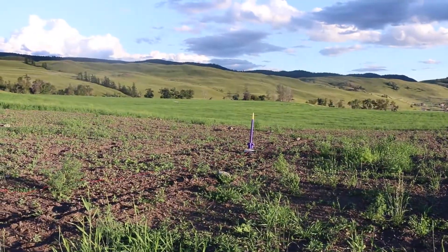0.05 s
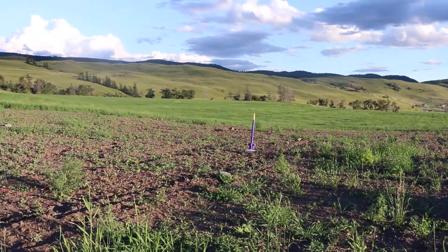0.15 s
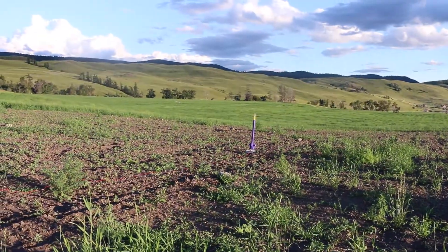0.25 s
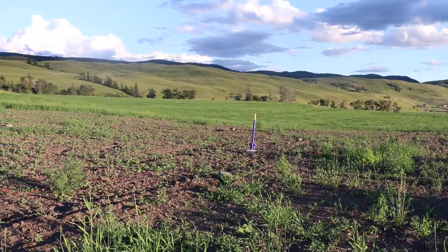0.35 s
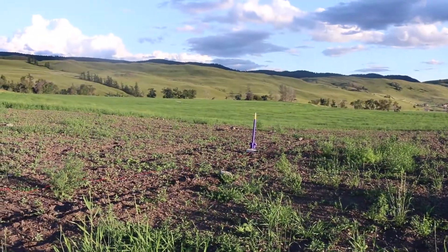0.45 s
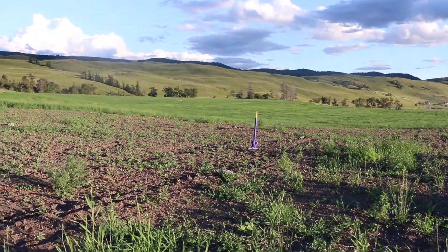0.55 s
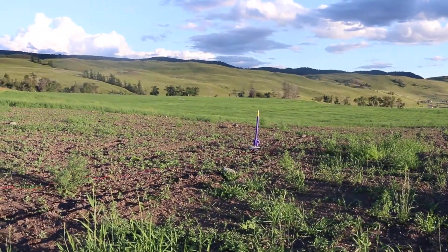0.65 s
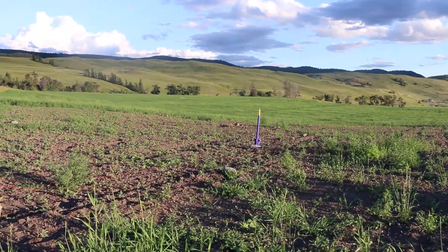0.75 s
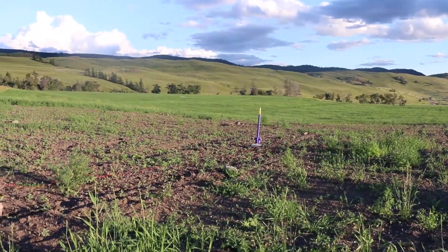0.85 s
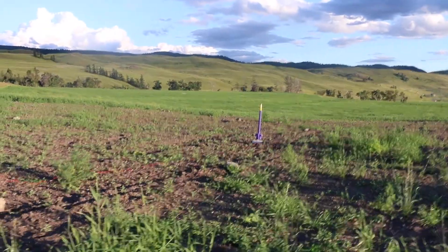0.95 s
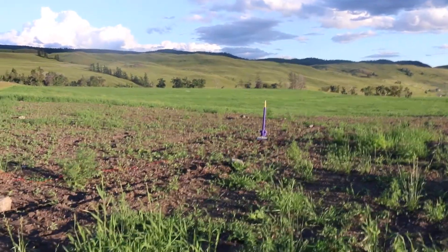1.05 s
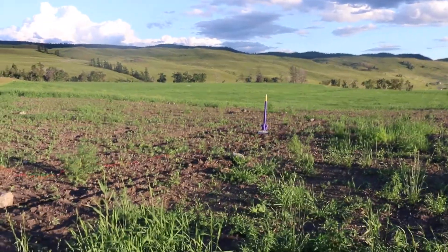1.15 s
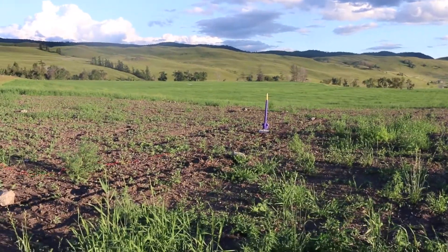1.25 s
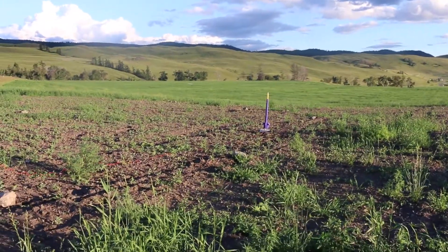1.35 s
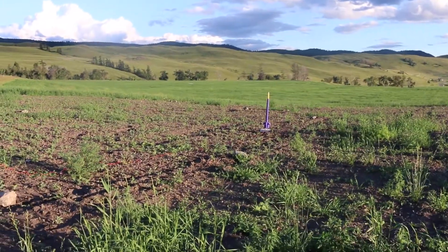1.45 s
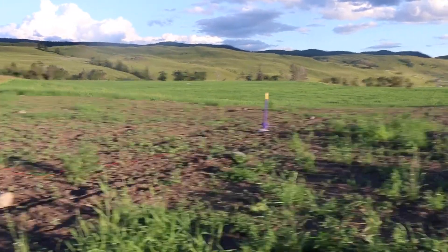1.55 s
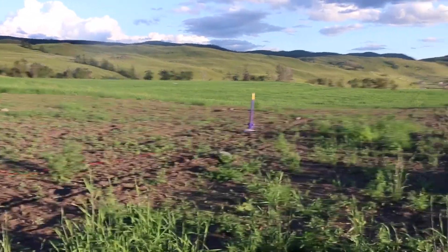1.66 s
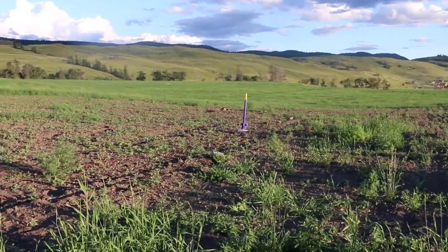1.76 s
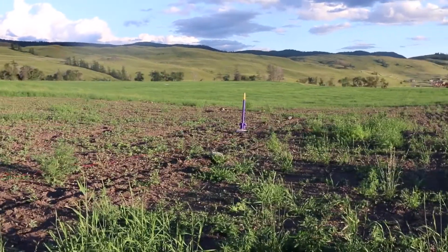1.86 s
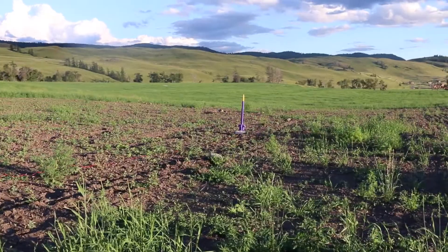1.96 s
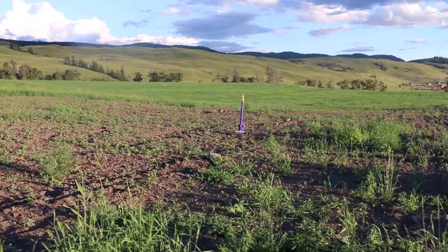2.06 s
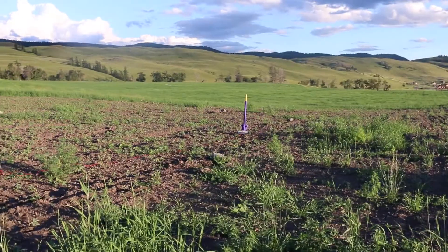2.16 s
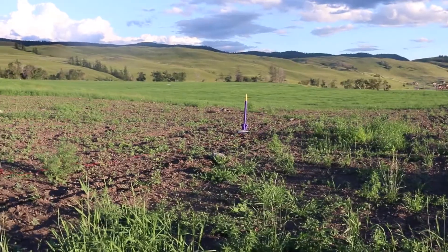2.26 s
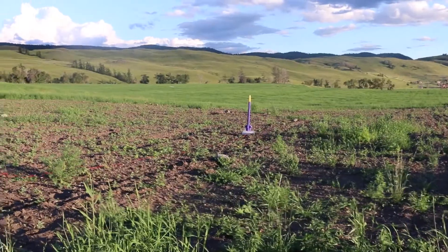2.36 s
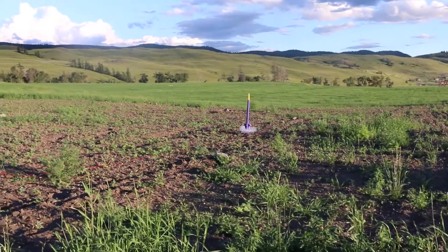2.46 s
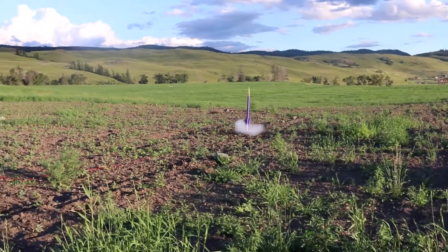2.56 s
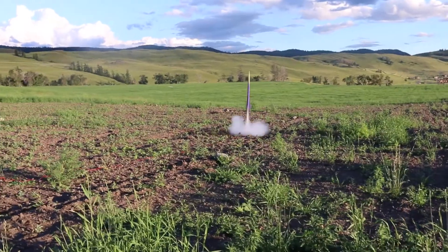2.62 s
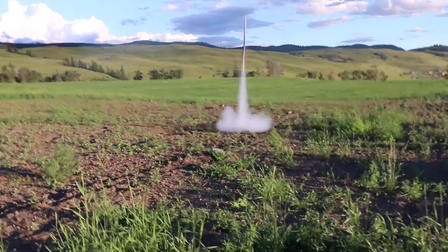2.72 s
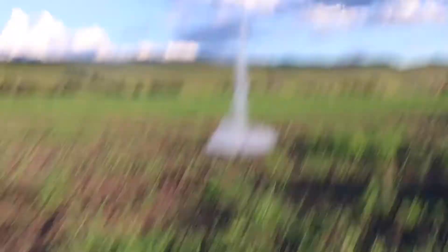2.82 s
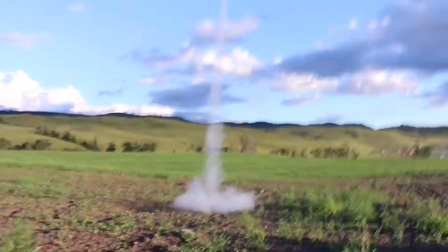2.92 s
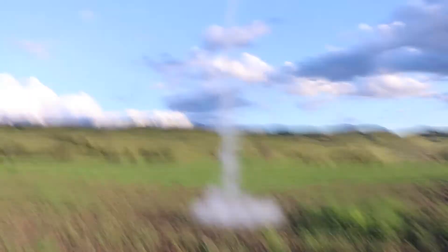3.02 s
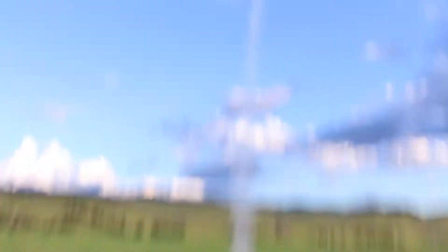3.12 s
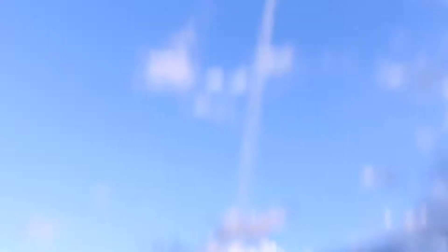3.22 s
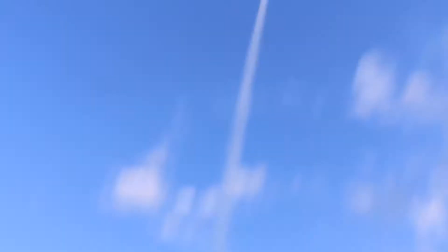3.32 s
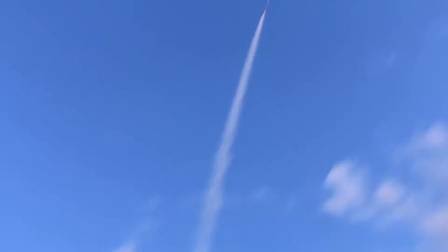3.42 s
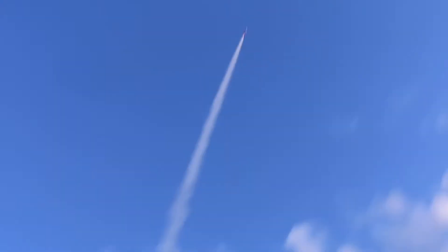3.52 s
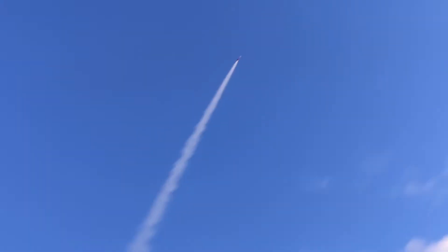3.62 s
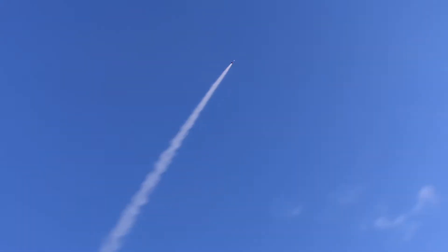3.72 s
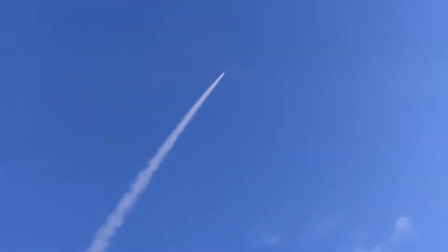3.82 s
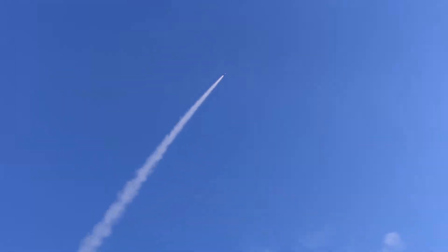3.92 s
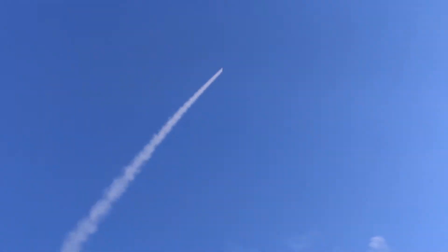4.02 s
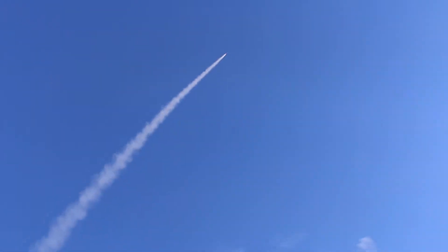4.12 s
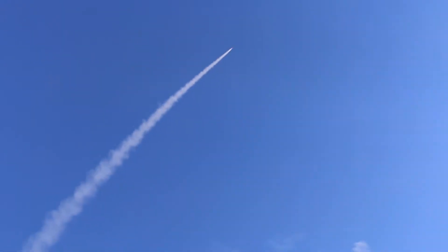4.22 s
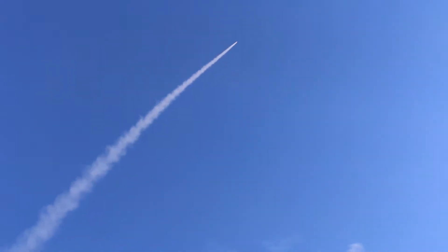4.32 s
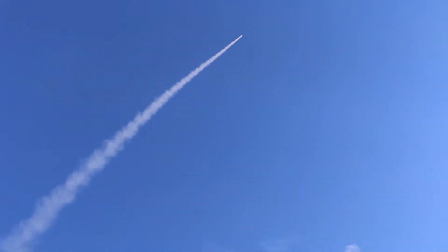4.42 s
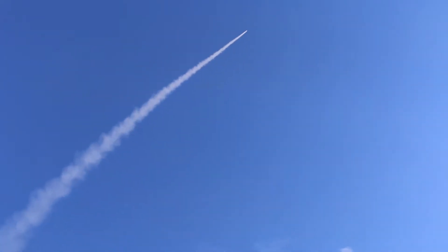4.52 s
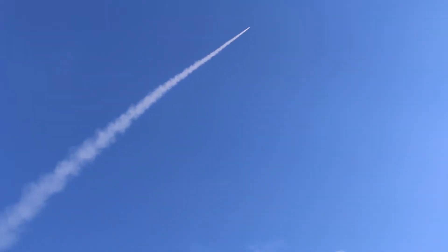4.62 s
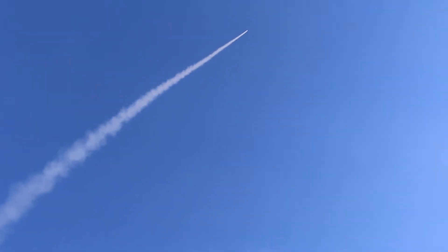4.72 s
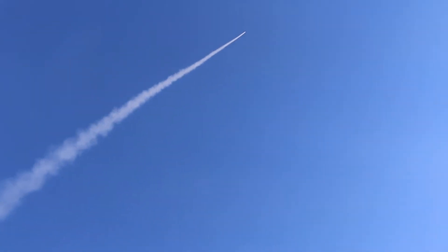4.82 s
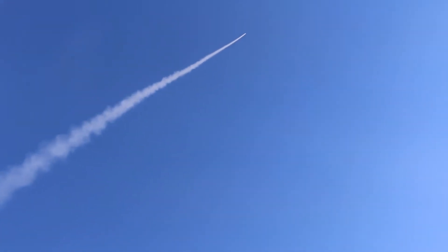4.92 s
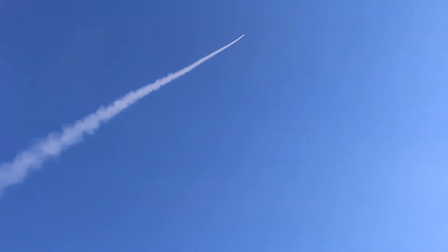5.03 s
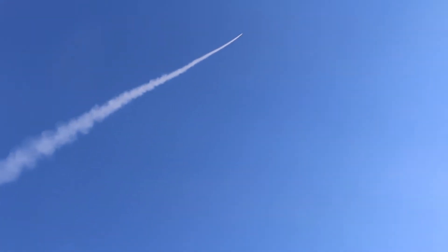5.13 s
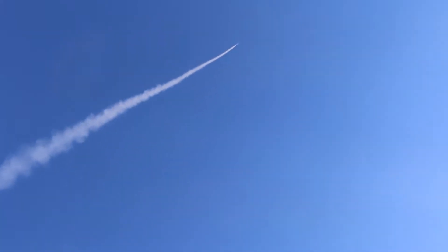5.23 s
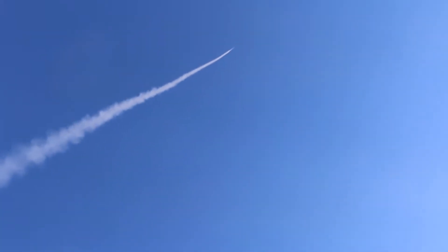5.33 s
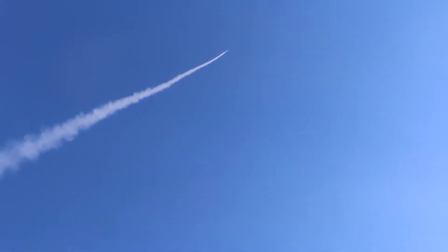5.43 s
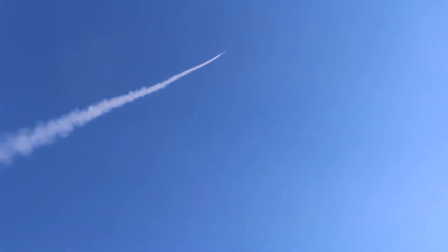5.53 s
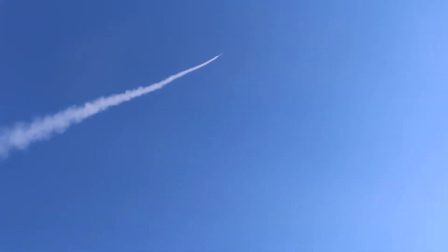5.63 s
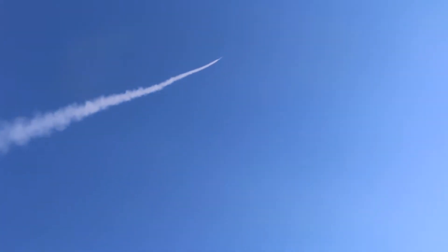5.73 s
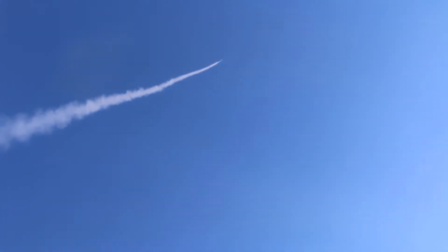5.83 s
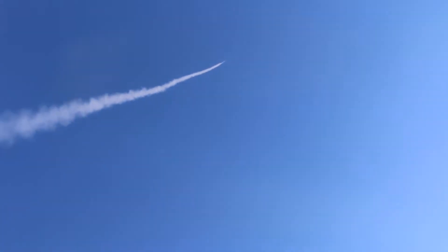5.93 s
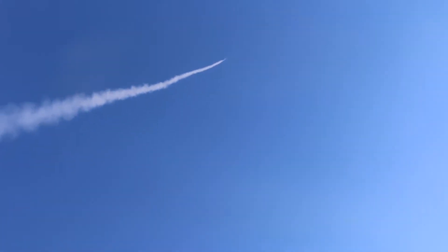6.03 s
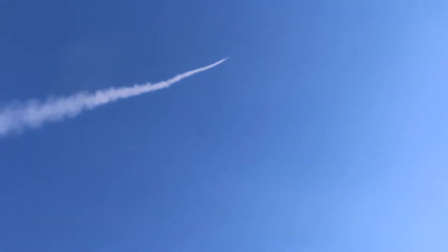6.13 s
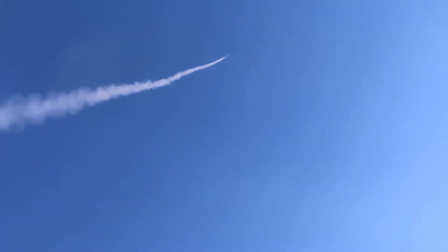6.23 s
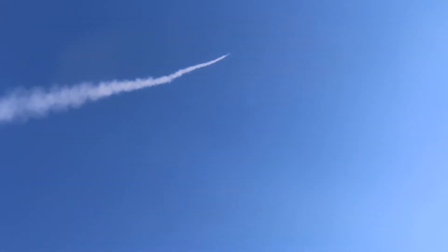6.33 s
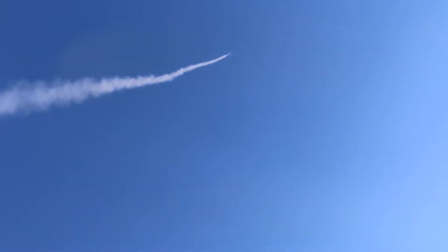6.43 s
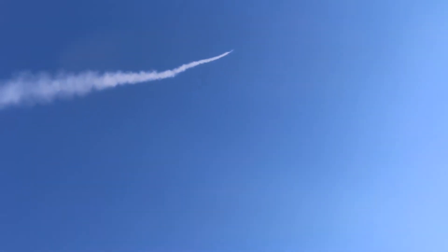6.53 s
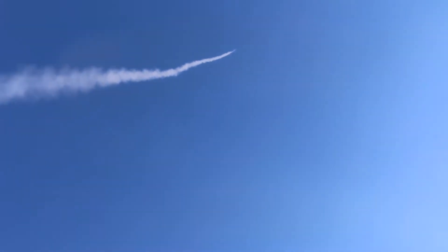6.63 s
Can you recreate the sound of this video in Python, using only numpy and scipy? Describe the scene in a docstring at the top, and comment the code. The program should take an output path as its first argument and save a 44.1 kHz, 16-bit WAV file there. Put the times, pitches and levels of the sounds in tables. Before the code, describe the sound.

Outdoors, heard from a hand-held camera: soft country hush, a raspy bird chip, thin whistles, then plastic clicking nearby. A loud snap and a thin hiss burst into a rocket's full jet roar, almost central at first, then widening as it rises, with irregular pops. The burn flares and quickly dies; its hissy echo fades over the hills while wind bumps the microphone.

```python
"""A model rocket lifts off from a ploughed field, some metres from a hand-held camera.
Filtered noise makes the jet: it hisses on the pad, climbs and burns out, with short spikes for its cracks.
A delayed copy off the soil sweeps a comb through the roar; long noise tails and delays make the echoes.
Before it come a few plastic clicks, built from ringing tones, and faint birds, built from gliding tones.
Light wind and the hush of the field are coloured noise."""
import sys
import numpy as np
from scipy import signal
from scipy.fft import rfft, irfft, next_fast_len
from scipy.io import wavfile
from scipy.ndimage import uniform_filter1d, map_coordinates

SR = 44100
rng = np.random.default_rng(int(sys.argv[2]) if len(sys.argv) > 2 else 0)


def master(y):
    """Save y as 16-bit WAV."""
    cut = np.clip(np.atleast_2d(y).T, -1, 1)
    pcm = np.round(cut * 32767)  # scale
    wavfile.write(sys.argv[1], SR, pcm.astype(np.int16))


N = 294279
T = np.arange(N) / SR  # time of every sample [s]
LEFT_RIGHT = np.array([[1], [-1]])  # opposite signs for the left and right port


def undb(db):
    """Turn decibels into gain."""
    return 10 ** (np.asarray(db) / 20)


def level(x, db=0):
    """Set the average (rms) level."""
    return x * undb(db) / np.sqrt(np.mean(x ** 2))


def curve(rows, t, axis=1):
    """Read one column of a table, joined by straight lines in time."""
    rows = np.array(rows)
    return np.interp(t, rows[:, 0], rows[:, axis])


def spectrum(rows, hz, axis=1):
    """Read one column of a table, joined on a log-frequency axis."""
    rows = np.array(rows)
    return np.interp(np.log(hz + 1), np.log(rows[:, 0]), rows[:, axis])


def colour(x, rows, axis=1):
    """Shape the tone with a fixed filter drawn from table points."""
    size = next_fast_len(N, real=True)
    gain = undb(spectrum(rows, np.fft.rfftfreq(size, 1 / SR), axis=axis))
    return irfft(rfft(x, size) * gain, size)[:N]


def butter(x, hz, kind="low", order=1):
    """Keep what lies below ("low") or above ("high") a frequency."""
    sos = signal.butter(order, min(hz, SR / 2 - 1), kind, fs=SR, output="sos")
    return signal.sosfilt(sos, x)


def moving_noise(db_at, size=512):
    """White noise under a gain db_at(Hz, s) that moves in time."""
    hz, t, z = signal.stft(rng.standard_normal(N), SR, nperseg=size)
    return signal.istft(z * undb(db_at(hz[:, None], t)), SR, nperseg=size)[1][:N]


def walk(rate):
    """Wander smoothly between random values, 'rate' of them a second; spread 1."""
    k = int(SR / rate)
    steps = np.repeat(rng.standard_normal(N // k + 1), k)
    return level(uniform_filter1d(steps, k)[:N])


def add(track, s, sound):
    """Mix a sound in at a time."""
    i = int(s * SR)
    track[i:i + len(sound)] += sound[:N - i]


# colour of the still air: (frequency [Hz], level per Hz [dB])
FIELD_COLOUR = [(15, -29), (25, -17), (64, -8), (87, -11), (120, -2.5), (195, -13.5), (263, -12.5),
                (439, -13), (476, -11), (607, -15.5), (988, -14.5), (1190, -17.5), (4140, -22.5),
                (16000, -31)]
# width of the hush: (frequency [Hz], side relative to middle [dB])
FIELD_WIDTH = [(60, -23.5), (200, -9), (700, -3.5), (4400, 0)]
FIELD_DB = -58


def field():
    """Soft, even hush of open country, wide in the treble."""
    mid, side = (level(colour(rng.standard_normal(N), FIELD_COLOUR), FIELD_DB) for _ in range(2))
    return (mid + LEFT_RIGHT * colour(side, FIELD_WIDTH)) * undb(0.092 * walk(3.5))


# the breeze grows once the camera faces the sky
CALM_DB, BREEZE_DB, BREEZE_S, BREEZE_RISE_S = -68, -59.5, 5.13, 0.2
DUCK_DB, DUCK_S, DUCK_LENGTH_S = -21, 4, 0.9  # the recorder's gain ducks the low wind while the loud jet burns
# colour of the wind: (frequency [Hz], level per Hz [dB])
WIND_COLOUR = [(15, -3), (35, -1), (70, 3.5), (130, -9.5), (220, -19), (500, -29.5), (2000, -74.5)]
# gusts: (time [s], level [dB], half length [s])
WIND_GUSTS = [(5.679, -55, 0.14), (6.136, -45.5, 0.033), (6.372, -52, 0.049), (6.54, -48, 0.013),
              (6.619, -51, 0.015)]


def wind(gust_db=2, pan_db=6, calm_swell_db=2):
    """Eddies buffet each port on its own, more once the camera points at the sky."""
    eddies = []
    for _ in range(2):
        flurry = undb(gust_db * walk(27))
        eddies.append(level(colour(rng.standard_normal(N), WIND_COLOUR) * flurry))
    duck = DUCK_DB * np.exp(-((T - DUCK_S) / DUCK_LENGTH_S) ** 2)
    calm = undb(CALM_DB + calm_swell_db * walk(2.8) + duck)
    breeze = undb(BREEZE_DB) * (1 + np.tanh((T - BREEZE_S) / BREEZE_RISE_S)) / 2
    gusts = sum(undb(db) * np.exp(-((T - s) / length) ** 2) for s, db, length in WIND_GUSTS)
    return np.array(eddies) * (calm + breeze + gusts) * undb(LEFT_RIGHT * pan_db / 2)


def whistle(length, start_hz, end_hz, db, waver):
    """A gliding, slightly unsteady tone that swells and fades."""
    u = np.linspace(0, 1, int(length * SR))
    hz = (start_hz + (end_hz - start_hz) * u) * (1 + waver * walk(900)[:len(u)])
    return undb(db) * np.sin(np.pi * u) * np.sin(2 * np.pi * np.cumsum(hz) / SR)


# bird notes: (time [s], length [s], start pitch [Hz], end pitch [Hz], level [dB], waver [share of pitch])
BIRD_NOTES = [(.409, .018, 1900, 2200, -47, .07), (.42, .015, 2100, 3200, -53, .1),
              (.409, .014, 3000, 3400, -56, .15), (.409, .012, 1400, 1500, -52, .08),
              (.45, .22, 1980, 1850, -64, .01), (.76, .12, 4700, 4300, -70, .02),
              (1.52, .05, 4650, 4450, -65, .012), (1.565, .1, 4250, 4020, -67, .012)]


def birds():
    """A raspy chip and thin, far whistles, each note a gliding tone."""
    out = np.zeros(N)
    for s, *note in BIRD_NOTES:
        add(out, s, whistle(*note))
    return out


# clicks of the hand-held plastic gear: (time [s], peak level of the ring [dB], low edge [Hz],
# brightness [Hz], peak level of the contact tick [dB], most strongly struck frequency [Hz])
GEAR_CLICKS = [(1.162, -41.5, 800, 3980, -43, 2000), (1.171, -44, 800, 4000, -40, 3000),
               (1.374, -26.5, 400, 2400, -30, 1850), (1.488, -46, 2200, 3000, -53, 2450),
               (1.499, -39, 1500, 9000, -39, 4200), (1.596, -33.5, 550, 900, -32, 800),
               (1.6001, -40, 550, 700, -48, 900), (1.631, -34.5, 1200, 4000, -29, 2600),
               (1.6336, -30.5, 600, 2500, -30, 1600), (1.734, -41, 1200, 900, -52, 1600),
               (1.8025, -29.5, 400, 1200, -37, 720), (1.806, -31.5, 750, 3000, -40, 2300)]
# ringing modes of the plastic case: (frequency [Hz], level [dB], time to die by 60 dB [s])
CASE_MODES = [(620, -16, 0.0048), (795, -12, 0.039), (998, -2, 0.054), (1220, 0, 0.019), (1695, -2, 0.026),
              (1820, 0, 0.02), (2010, -3, 0.024), (2440, 1, .022), (2870, 4, 0.0072), (3700, 2, 0.01),
              (4250, -2, .012), (5050, -6, 0.025), (6940, 7, 0.0037), (9900, -7, .003)]


def clicks(tick_hz=500, tick_s=0.0011, struck_db=5, struck_octaves=0.33):
    """Hard little contacts tick and ring the plastic case; each spot favours its own modes."""
    out, t = np.zeros(N), T[:SR // 10]
    chance = rng.standard_normal((len(GEAR_CLICKS), len(CASE_MODES), 3))
    grit = rng.standard_normal((len(GEAR_CLICKS), len(t)))
    for click, draws, noise in zip(GEAR_CLICKS, chance, grit):
        s, db, low_hz, bright_hz, tick_db, struck_hz = click
        ring = np.zeros(len(t))
        # chance shifts each mode's level, pitch and phase
        for (hz, mode_db, t60), (a, b, phase) in zip(CASE_MODES, draws):
            favour = struck_db * np.exp(-(np.log2(hz / struck_hz) / struck_octaves) ** 2)
            tone = np.sin(2 * np.pi * hz * (1 + 0.008 * b) * t + phase)
            ring += undb(mode_db + favour + a) * tone * np.exp(-np.log(1000) * t / t60)
        ring = butter(butter(ring, bright_hz), low_hz, "high", order=2)
        tick = butter(noise, tick_hz, "high") * np.exp(-t / tick_s)
        add(out, s, undb(db) * ring / np.abs(ring).max() + undb(tick_db) * tick / np.abs(tick).max())
    return out


def rustle(centre_s=1.68, spread_s=0.18, db=-61, low_hz=450, high_hz=750):
    """A hand shifts softly on the case between the clicks: a swell of narrow noise."""
    rub = butter(butter(rng.standard_normal(N), low_hz, "high", order=2), high_hz, order=2)
    return level(rub, db) * np.exp(-((T - centre_s) / spread_s) ** 2)


PORT_LAG_S, HAND_PAN_DB = 0.00003, -0.5  # left behind right; left minus right


def from_right(x):
    """A near sound reaches the left port a little later and softer."""
    late = map_coordinates(x, [(T - PORT_LAG_S) * SR])
    return np.array([late, x]) * undb(LEFT_RIGHT * HAND_PAN_DB / 2)


# cracks of the igniter and of sputtering propellant: (time [s], peak level [dB], brightness [Hz],
# swing-back [Hz], gain of the gas puff before its bass is cut [dB])
CRACKS = [(2.349, 1.5, 8000, 280, -33), (2.34905, -16.5, 1300, 380, -38), (2.6307, -6.5, 2190, 700, -28),
          (3.122, -15.5, 2200, 800, -46), (3.282, -24, 900, 260, -30), (3.3174, -12, 2630, 500, -29),
          (3.452, -30, 600, 250, -43), (3.503, -16, 1010, 450, -23), (3.698, -13, 2000, 650, -22),
          (3.7558, -10, 2200, 650, -22), (4.0037, -2.5, 2400, 749, -20), (4.243, -11, 1700, 901, -26),
          (4.649, -20, 1210, 404, -37), (5.1785, -7, 2540, 750, -19.5), (5.182, -4, 2600, 800, -17),
          (5.497, -8, 3500, 500, -35)]


def pops(spike_s=0.000048, gas_s=0.0034, gas_hz=1400, gas_low_hz=290, lead_s=0.01):
    """Each crack is a steep pressure spike that swings back, inside a dull puff of gas."""
    out, t = np.zeros(N), T[:SR // 20]
    noises = rng.standard_normal((len(CRACKS), len(t)))
    for (s, db, hz, swing_hz, gas_db), noise in zip(CRACKS, noises):
        spike = butter(np.exp(-t / spike_s), hz, order=2)
        spike = butter(spike, swing_hz, "high", order=2)
        add(out, s, -undb(db) * spike / np.abs(spike).max())
        # the puff peaks together with the spike
        gas = level(butter(butter(noise, hz), gas_hz)) * np.exp(-((t - lead_s) / gas_s) ** 2)
        add(out, s - lead_s, undb(gas_db) * butter(gas, gas_low_hz, "high", order=2))
    return out


# straight up at constant acceleration; the path bends downrange, less for a larger ARC_M
LIFTOFF_S, ACCEL_M_S2, PAD_HEIGHT_M, TRAIL_M = 2.53, 35.97, 0.44, 0.34
PAD_DISTANCE_M, ARC_M = 9.89, 317


def height(t):
    """Height of the loudest part of the jet [m]: on the pad, then a little behind the nozzle."""
    climb = ACCEL_M_S2 * np.maximum(t - LIFTOFF_S, 0) ** 2 / 2
    return np.maximum(climb - TRAIL_M, PAD_HEIGHT_M)


def downrange(z):
    """Distance over the ground [m]; it grows as the flight bends over."""
    return PAD_DISTANCE_M + z * (z / ARC_M) ** 2


# the jet's colour tilts as roar below the pivot and as hiss above it
ROAR_HZ, PIVOT_HZ, HISS_HZ = 528, 2270, 6870
SIZZLE_HZ = 12900  # the very top of the blast on the pad
PAD_DB, PAD_ROAR_DB, PAD_HISS_DB = 10.5, 1, -4.5
# while the gas is cool, low resonances sit flat and the hollow between them is deep
WARM_S, WARMING_S, COOL_PITCH_SHARE = 2.57, 0.034, 0.94
HOLLOW_HZ, HOLLOW_WIDTH_HZ, HOLLOW_DB = 1280, 140, -2.5
# exhaust striking the pad: (frequency [Hz], level per Hz [dB])
PAD_COLOUR = [(60, -37.5), (170, -14.5), (360, -3), (490, -2), (690, -15.5), (1000, 6.5), (1300, 0),
              (1800, 2), (3000, -3.5), (4300, 1), (7000, -2.5), (9000, -3), (11500, -6), (16000, -13.5)]
# resonances between nozzle and blast plate: (frequency [Hz], width [Hz], boost [dB])
PLATE_MODES = [(2000, 300, 1), (3460, 590, 4), (5460, 380, 2), (6940, 930, 7.5), (8580, 620, 5.5),
               (10430, 500, 3.5)]
# the motor builds pressure: (time [s], jet level before the pad's gain [dB],
# treble added to the pad's hiss setting [dB], further lift of the very top [dB])
IGNITION = [(2.36, -34, 2, 2), (2.378, -42.5, 9.5, 0), (2.438, -43, 6.5, -3), (2.49, -36.5, 8, -4),
            (2.574, -24.5, 3.5, 1.5), (2.63, -23, 2.5, 4), (2.665, -26, 10, -2), (2.705, -30.5, 8.5, 0),
            (2.75, -23.5, -1, 4), (2.8, -25.5, 4.5, 5), (2.84, -24, -0.5, 3), (2.912, -26.5, -1, 3),
            (2.93, -26, 3, 0)]


def pad_db(hz, t, low, high):
    """The jet strikes the blast plate, which rings; pitch and hollow settle as the gas warms."""
    plate = sum(db / (1 + (2 * (hz - centre) / width) ** 2) for centre, width, db in PLATE_MODES)
    top = np.clip((hz - HISS_HZ) / (SIZZLE_HZ - HISS_HZ), 0, 1)
    treble = (curve(IGNITION, t, axis=2) + PAD_HISS_DB) * np.minimum(high, 1)
    sizzle = curve(IGNITION, t, axis=3) * top
    cool = (1 - np.tanh((t - WARM_S) / WARMING_S)) / 2
    pitch = 1 - (1 - COOL_PITCH_SHARE) * cool * (hz < PIVOT_HZ)
    hollow = HOLLOW_DB * cool * np.exp(-((hz - HOLLOW_HZ) / HOLLOW_WIDTH_HZ) ** 2)
    return PAD_DB + spectrum(PAD_COLOUR, hz / pitch) + hollow + plate + PAD_ROAR_DB * low + treble + sizzle


FLIGHT_DB = 9.5
ROAR_DB, TAIL_ROAR_DB, TAIL_FOCUS = -14, 10.5, 6  # roar is beamed out of the tail
HISS_DB, HISS_DB_PER_DOUBLING = -1.57, -3  # hiss fades with each doubling of distance
LOBE_DB, LOBE_DEG, LOBE_WIDTH_DEG = 5, 25.8, 11.3  # and is beamed sideways, strongest at this elevation
AIR_DB_PER_M, AIR_HZ = 0.0658, 13600  # loss in the air at this frequency, steeper above
# the free jet: (frequency [Hz], level per Hz [dB])
JET_COLOUR = [(60, -28.5), (150, -18), (240, -9), (400, -4), (700, -3), (1000, 2), (1300, 0), (1800, 2.5),
              (3200, 2), (4500, 2.5), (6000, -0.5), (8000, -0.5), (10500, -5.5), (13000, -10), (16000, -17)]


def flight_db(hz, z, low, high):
    """As the jet turns its tail to the listener and recedes, roar grows and hiss dulls."""
    elevation, distance = np.arctan2(z, downrange(z)), np.hypot(z, downrange(z))
    roar = ROAR_DB + TAIL_ROAR_DB * np.sin(elevation) ** TAIL_FOCUS
    lobe = LOBE_DB * np.exp(-((np.degrees(elevation) - LOBE_DEG) / LOBE_WIDTH_DEG) ** 2)
    hiss = HISS_DB + HISS_DB_PER_DOUBLING * np.log2(distance / PAD_DISTANCE_M) + lobe
    air = -AIR_DB_PER_M * (distance - PAD_DISTANCE_M) * (hz / AIR_HZ) ** 3
    return FLIGHT_DB + spectrum(JET_COLOUR, hz) + roar * low + hiss * high + air


# the last of the grain flares, then the pressure collapses; the middle of the spectrum dies first
BURNOUT_S, FLARE_DB, FLARE_S = 5.491, 3.5, 0.36
FADE_DB_PER_S, ROAR_LINGER_DB, HISS_LINGER_DB, LINGER_S = 219.5, 14.5, 7, 0.049


def burnout_db(t, low, high):
    """A last flare and a fast fade, in which roar and hiss linger a little."""
    spent = np.maximum(t - BURNOUT_S, 0)
    flare = FLARE_DB * np.exp(np.minimum(t - BURNOUT_S, 0) / FLARE_S)
    linger = np.minimum(spent / LINGER_S, 1) * (ROAR_LINGER_DB * low + HISS_LINGER_DB * np.minimum(high, 1))
    return flare - FADE_DB_PER_S * spent + linger


# height where the blend towards the free jet's colour begins, and the further rise until it is complete;
# on the pad the free colour is already slightly mixed in
BLEND_M, CLEARING_M = 0.34, 2.6
# the steady burn in flight: (time [s], jet level before the flight's gain [dB])
STEADY_BURN = [(2.97, -25.5), (3.08, -24.5), (3.31, -25), (3.64, -23), (3.75, -22.5), (3.92, -26.5),
               (4.23, -26.5), (4.92, -23), (5.27, -25)]


def jet_db(hz, t):
    """The exhaust leaves the pad: its colour blends towards that of free air as the rocket rises."""
    z = height(t)
    free = np.clip((z - BLEND_M) / CLEARING_M, 0, 1)
    octave = np.log((hz + 1) / PIVOT_HZ)
    low = np.clip(octave / np.log(ROAR_HZ / PIVOT_HZ), 0, 1)
    high = np.maximum(octave / np.log(HISS_HZ / PIVOT_HZ), 0)
    burn = curve([row[:2] for row in IGNITION] + list(STEADY_BURN), t)
    blend = (1 - free) * pad_db(hz, t, low, high) + free * flight_db(hz, z, low, high)
    return burn + blend + burnout_db(t, low, high)


LIGHT_S, ATTACK_S = 2.349, 0.0053


def jet(lowest_hz=110):
    """Turbulent gas that flutters with the uneven burn, from ignition until the grain is spent."""
    alight = np.clip((T - LIGHT_S) / ATTACK_S, 0, 1)
    flutter_db = 0.5 * walk(35) + 0.55 * walk(400)
    return butter(moving_noise(jet_db) * alight * undb(flutter_db), lowest_hz, "high", order=3)


def mottle(x, patchy_db, patch_s, patch_hz, size=512):
    """Brief bright and dull patches scattered over time and frequency."""
    hz, t, z = signal.stft(x, SR, nperseg=size)
    grid = np.meshgrid(hz / patch_hz, t / patch_s, indexing="ij")
    patches = map_coordinates(rng.standard_normal((128, 512)), grid, order=1, mode="mirror")
    return signal.istft(z * undb(patchy_db * patches), SR, nperseg=size)[1][..., :N]


RUMBLE_S, RUMBLE_RISE_S, RUMBLE_LOW_HZ, RUMBLE_HIGH_HZ = 2.55, 0.04, 282, 390
RUMBLE_DB, RUMBLE_DB_PER_M = -41, -1.68  # level at zero height; change with height


def pad_rumble():
    """Low beating of the plume on the ground, which weakens as the rocket rises."""
    band = butter(rng.standard_normal(N), RUMBLE_LOW_HZ, "high", order=3)
    band = butter(band, RUMBLE_HIGH_HZ, order=3)
    thrust = (1 + np.tanh((T - RUMBLE_S) / RUMBLE_RISE_S)) / 2
    return level(band, RUMBLE_DB) * thrust * undb(RUMBLE_DB_PER_M * height(T))


# fine crackle of the burning grain; CRACKLE_DB is the smallest peak
CRACKLES_PER_S, CRACKLE_DB, CRACKLE_SPREAD_DB, CRACKLE_LOW_HZ, CRACKLE_HIGH_HZ = 70, -23, 4, 600, 3200


def crackle(count=400):
    """Small shocks of uneven size, at random moments from lift-off to burnout."""
    gap, size = rng.exponential(size=(count, 2)).T
    shock = butter(signal.unit_impulse(SR // 100), CRACKLE_HIGH_HZ, order=2)
    shock = butter(shock, CRACKLE_LOW_HZ, "high", order=2)
    out = np.zeros(N)
    times = LIFTOFF_S + np.cumsum(gap) / CRACKLES_PER_S
    peaks_db = CRACKLE_DB + CRACKLE_SPREAD_DB * np.minimum(size, 3)
    for s, db in zip(times, peaks_db):
        if s < BURNOUT_S:
            add(out, s, -undb(db) * shock / np.abs(shock).max())
    return out


CAMERA_HEIGHT_M, SOUND_M_S = 1.49, 343


def ground_bounce(x, share=0.56, soil_hz=3700, furrow_share=0.15, furrow_stretch=1.045,
                  smoke_loss=0.5, smoke_m=0.98):
    """Rough soil returns a duller copy, later as the rocket rises: a falling comb. A furrow adds another."""
    z = height(T)
    straight = np.hypot(downrange(z), z - CAMERA_HEIGHT_M)
    detour = np.hypot(downrange(z), z + CAMERA_HEIGHT_M) - straight
    dulled = irfft(rfft(x) / (1 + (np.fft.rfftfreq(N, 1 / SR) / soil_hz) ** 2), N)

    def bounce(metres):
        """The dulled copy, late by the time sound needs for the extra path."""
        return map_coordinates(dulled, [(T - metres / SOUND_M_S) * SR], order=1)

    # just above the pad the long plume blurs the comb
    clear = 1 - smoke_loss * np.exp(-(np.log2(z / smoke_m)) ** 2)
    soil = share * clear * bounce(detour)
    furrow = furrow_share * bounce(detour * furrow_stretch)
    return (x + soil + furrow) / np.sqrt(1 + share ** 2 / 2)


# echo from field and hills: (frequency [Hz], level before the echo's gain [dB], time to die by 60 dB [s])
HILL_ECHO = [(100.8, -46, 2), (387, -30, 4.9), (1070, -22.5, 7.1), (2040, -26, 3.1), (3420, -16.5, 2.1),
             (5070, -17.5, 1.94), (9230, -11, 1.05), (16080, -44, 0.73)]


def hills(x, apart_hz=2500, build_s=0.058, echo_db=1):
    """Diffuse far echo that takes a moment to build; the top dies first and differs most between ports."""
    build = undb(echo_db) * (1 - np.exp(-(T / build_s) ** 2))

    def decay_db(hz, t):
        """Fading level of the echo; the last term evens out the energy of long and short tails."""
        t60 = spectrum(HILL_ECHO, hz, axis=2)
        return spectrum(HILL_ECHO, hz) - 60 * t / t60 - 10 * np.log10(SR * t60 / np.log(1e6))

    mid, side = (signal.fftconvolve(x, build * moving_noise(decay_db))[:N] for _ in range(2))
    return (mid + LEFT_RIGHT * butter(side, apart_hz, "high")) / np.sqrt(2)


# rows of trees: (delay [s], level [dB], centre of the band [Hz])
TREE_ROWS = [(0.3, -34, 2890), (0.53, -33, 2200), (0.76, -38.5, 1910)]


def trees(x, flutter_db=2.0, flutter_hz=28):
    """Each row of trees returns a narrow, wavering band of the roar, leaning to its own side."""
    out = np.zeros((2, N))
    for k, (delay, db, hz) in enumerate(TREE_ROWS):
        band = butter(butter(x, hz / np.sqrt(2), "high", order=3), hz * np.sqrt(2), order=4)
        echo = undb(db + flutter_db * walk(flutter_hz)) * np.interp(T - delay, T, band, left=0)
        out += echo * undb(LEFT_RIGHT * (-1) ** k)
    return out


# the two microphone ports: (frequency [Hz], left minus right [dB], unshared sound [dB])
MIC_PORTS = [(200.6, 1, -38.5), (514, -0.8, -27), (1300, -0.7, -17), (1770, 0, -16.5), (2410, -2, -8),
             (3110, -3, -6), (4000, -3, -5), (4810, -1, -6), (5900, 0.5, -1.5), (6460, -3.5, -3),
             (7970, -2.5, -4), (11000, -1, -12.5), (15950, -1, -14)]
# change in the unshared sound before the jet widens: (frequency [Hz], change [dB])
NARROW_START = [(1200, -30), (2400, -8.5), (4400, -17), (8000, -8), (12000, 3.5)]


def ports(x, scatter, widen_s=3.3, widen_length_s=1.0):
    """The camera body shades the ports differently; the jet is nearly mono at first and widens in flight."""
    shaded = []
    for port, side in zip(x, (1, -1)):
        shaded.append(colour(port, [(hz, side * db / 2) for hz, db, _ in MIC_PORTS]))
    wide = np.clip((T - widen_s) / widen_length_s, 0, 1)
    unshared = colour(scatter, MIC_PORTS, axis=2)
    apart = wide * unshared + (1 - wide) * colour(unshared, NARROW_START)
    return np.array(shaded) + LEFT_RIGHT * apart


def last_gas():
    """The last gas whistles briefly through the empty casing."""
    out = np.zeros(N)
    add(out, 5.605, whistle(length=0.046, start_hz=1270, end_hz=1310, db=-41.5, waver=0.025))
    return out


def knock(s=6.0632, body_hz=560, body_db=-37, body_s=0.0033,
          tick_hz=(4400, 5100), tick_db=-43, tick_s=0.0018):
    """A finger bumps the tilted camera: a dead knock with a small two-toned tick on top."""
    out, t = np.zeros(N), T[:SR // 20]
    body = undb(body_db) * np.sin(2 * np.pi * body_hz * t) * np.exp(-t / body_s)
    tick = undb(tick_db) * sum(np.sin(2 * np.pi * hz * t) for hz in tick_hz) * np.exp(-t / tick_s)
    add(out, s, tick - body)
    return out


def scene():
    """Rocket, its echo, and the field around."""
    roar = mottle(jet(), patchy_db=2.2, patch_s=0.028, patch_hz=330)
    rocket = ground_bounce(roar + pad_rumble() + pops() + crackle()) + last_gas()
    echo = mottle(hills(rocket), patchy_db=0.5, patch_s=0.06, patch_hz=389) + trees(rocket)
    handling = from_right(clicks() + rustle()) + knock()
    scatter = ground_bounce(jet())  # a second, independent jet noise for the unshared sound
    return ports(rocket + echo, scatter) + handling + birds() + field() + wind()


TOP_HZ = 15900


def record(dry):
    """The camera rounds the tallest cracks and cuts the top."""
    rounded = dry / (1 + (dry / .9) ** 6) ** (1 / 6)
    return signal.sosfilt(signal.ellip(10, .1, 80, TOP_HZ, fs=SR, output="sos"), rounded)


dry = scene()
out = record(dry)
master(out)
```